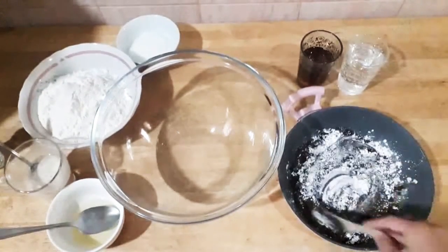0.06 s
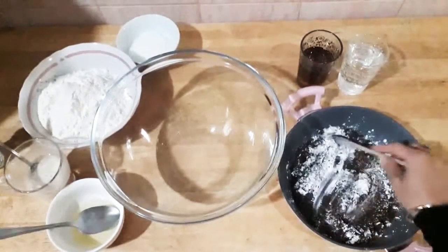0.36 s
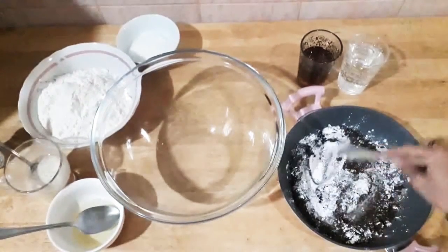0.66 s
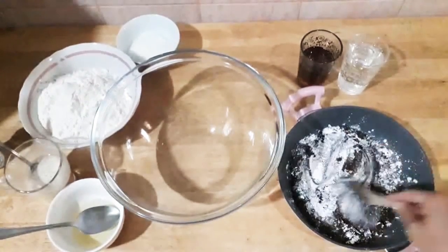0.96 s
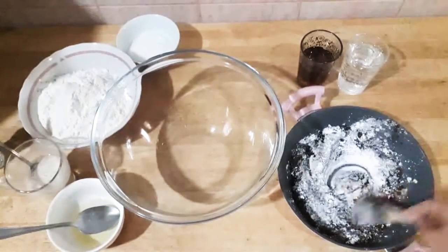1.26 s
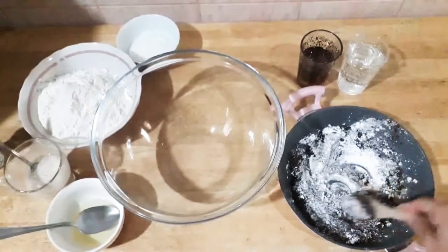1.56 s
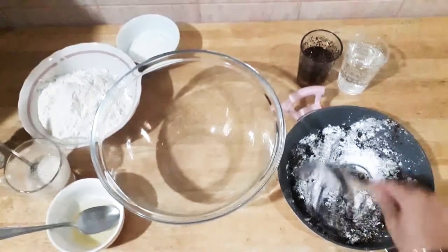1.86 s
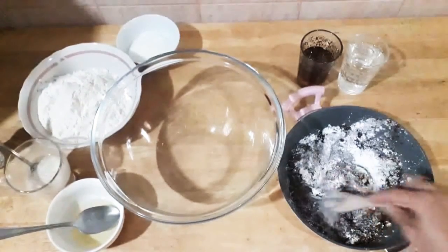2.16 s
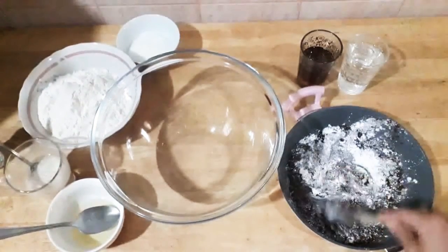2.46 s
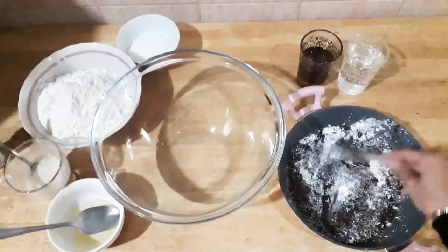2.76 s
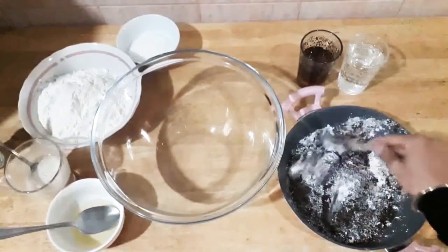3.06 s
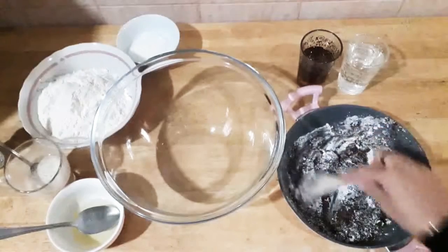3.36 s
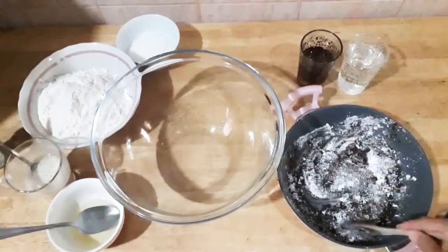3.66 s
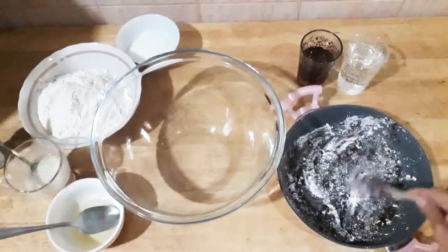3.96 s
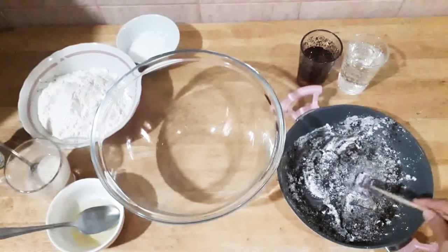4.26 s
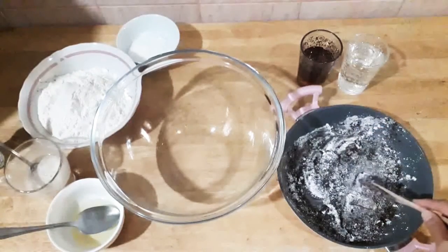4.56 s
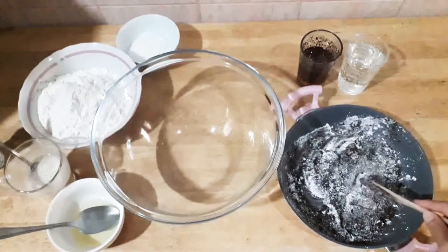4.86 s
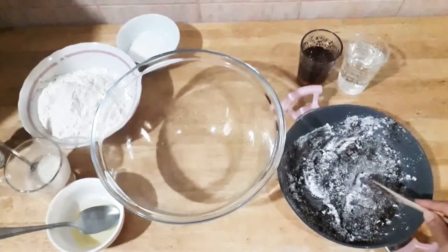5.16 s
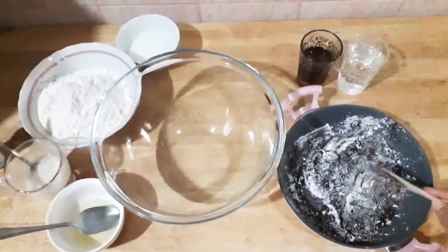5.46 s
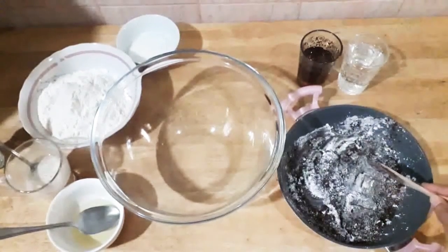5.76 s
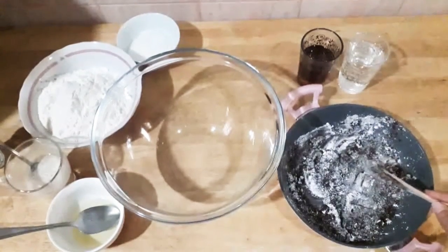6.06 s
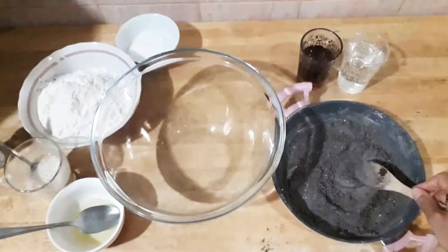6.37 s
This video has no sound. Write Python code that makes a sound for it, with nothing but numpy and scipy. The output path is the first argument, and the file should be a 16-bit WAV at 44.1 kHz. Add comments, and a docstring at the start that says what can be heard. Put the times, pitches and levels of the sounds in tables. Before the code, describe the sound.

Quick gritty spoon scrapes and clacks in a pan of powder end with two hard raps, over a faint kitchen hum.

```python
"""A motor, probably the fridge, hums in a bare kitchen. From 0.1 s a spoon stirs dry powder round a
nonstick pan: each stroke crunches the grains, rasps the pan and lets loose powder hiss. On the way the
spoon knocks on floor and wall, and hard pushes shift the pan on the wooden counter. Two hard raps at
3.9 s and 4.1 s end the stirring; hum and room air go on to 6.5 s."""
import sys
import numpy as np
from scipy import signal
from scipy.fft import rfft, irfft, next_fast_len
from scipy.io import wavfile
from scipy.ndimage import uniform_filter1d

SR = 44100
rng = np.random.default_rng(int(sys.argv[2]) if len(sys.argv) > 2 else 0)


def store_pcm(level_fs):
    """Save levels as 16-bit WAV."""
    pcm = np.round(np.clip(level_fs, -1, 1) * 32767).astype(np.int16)
    wavfile.write(sys.argv[1], SR, np.atleast_2d(pcm).T)


N = 287223


def from_db(db):
    """Decibels to gain."""
    return 10 ** (np.asarray(db) / 20)


def unit_rms(x):
    """Scale to rms 1."""
    return x / np.sqrt(np.mean(x ** 2) + 1e-20)


def add(out, start_s, x):
    """Mix x in from start_s."""
    at = round(start_s * SR)
    out[at:at + len(x)] += x[:len(out) - at]


def filtered(x, spectrum):
    """Apply (f/Hz, gain/dB) points, interpolated in log frequency."""
    size = next_fast_len(len(x), real=True)
    hz = np.fft.rfftfreq(size, 1 / SR)
    points_hz, points_db = np.transpose(spectrum)
    gain_db = np.interp(np.log(np.maximum(hz, 1)), np.log(points_hz), points_db)
    return irfft(rfft(x, size) * from_db(gain_db), size)[:len(x)]


def coloured(x, spectrum):
    """Filter, then scale to rms 1."""
    return unit_rms(filtered(x, spectrum))


def drift(rate_hz):
    """Slow random wander, rms about 1."""
    size, hop = 2 ** 13, 40
    hz = np.fft.rfftfreq(size, hop / SR)
    slow = irfft(rfft(rng.standard_normal(size)) / (1 + (hz / rate_hz) ** 2))
    return np.interp(np.arange(N) / hop, np.arange(size), unit_rms(slow))


def grains(per_s, size_db):
    """Tiny slips at random times; size_db scales their spread in level."""
    sizes = from_db(size_db * np.minimum(rng.exponential(1, N), 4)) * rng.choice([-1, 1], N)
    return sizes * (rng.random(N) < per_s / SR)


def ring(force, modes):
    """Damped modes in parallel, signs alternating."""
    out = 0
    for k, (hz, level_db, t60_s) in enumerate(modes):
        radius = np.exp(-np.log(1000) / (t60_s * SR))
        poles = [1, -2 * radius * np.cos(2 * np.pi * hz / SR), radius ** 2]
        out += (-1) ** k * from_db(level_db) * signal.lfilter([.5, 0, -.5], poles, force + 1e-18)
    return out


def swept(x, hz, width_hz):
    """Resonance with a moving centre; rms 1."""
    out, state = np.zeros(N), np.zeros(2)
    radius = np.exp(-np.pi * width_hz / SR)
    for i in range(0, N, 128):
        block = slice(i, i + 128)
        poles = [1, -2 * radius * np.cos(2 * np.pi * hz[i] / SR), radius ** 2]
        out[block], state = signal.lfilter([1, 0, -1], poles, x[block], zi=state)
    return unit_rms(out)


# stereo width: f/Hz, side-to-mid level/dB
STEREO_WIDTH = [(60, -25.5), (110, -33), (200, -25), (380, -18.5), (700, -14.5), (1290, -15.5),
                (2380, -9.5), (4400, -6), (8120, 0.5), (15000, -5)]


def spread(mid, other):
    """Two unrelated signals to stereo: narrow bass, wide treble."""
    side = filtered(other, STEREO_WIDTH)
    return np.array([mid + side, mid - side])


# kitchen decay: f/Hz, t60/s
KITCHEN_DECAY = [(150, 0.37), (600, 0.41), (1400, 0.5), (3000, 0.45), (5000, 0.32), (8000, 0.39)]


def kitchen(x, wet_db, build_s):
    """Direct sound plus a diffuse tail that builds up, then dies band by band."""
    t = np.arange(2 ** 15) / SR
    hz = np.fft.rfftfreq(len(t), 1 / SR)
    white = rfft(rng.standard_normal(len(t)))
    centres_hz, t60s = np.transpose(KITCHEN_DECAY)
    tail = 0
    for t60_s, share in zip(t60s, np.eye(len(centres_hz))):
        band = irfft(white * np.interp(hz, centres_hz, share))
        tail += band * np.exp(-np.log(1000) * t / t60_s)
    spectrum = rfft(tail)
    whitened = irfft(spectrum / np.sqrt(uniform_filter1d(np.abs(spectrum) ** 2, size=41)))
    build_up = 1 - np.exp(-(t / build_s) ** 2)
    fade_out = np.clip(2 - 2.5 * t / t[-1], 0, 1)
    tail = whitened * build_up * fade_out
    return x + from_db(wet_db) * signal.fftconvolve(x, tail / np.linalg.norm(tail))[:len(x)]


# room air and microphone hiss: f/Hz, relative level/dB
AIR_SPECTRUM = [(20, -14), (45, -11.5), (80, -2), (140, -1), (250, -6), (420, -10), (600, -7.5),
                (900, -11.5), (1400, -16), (1900, -21), (3000, -22), (3900, -19.5), (6000, -24.5),
                (10000, -28.5), (15800, -24)]


def room_air():
    """Steady noise, strongest in the bass."""
    return from_db(-68) * spread(*[coloured(rng.standard_normal(N), AIR_SPECTRUM) for _ in range(2)])


# motor hum lines: f/Hz, rms level/dB
MOTOR_LINES = [(58.5, -76), (116.5, -63), (174, -70.5), (232, -77), (293, -76), (354, -71.5), (414, -70),
               (556, -78), (984, -84), (1535, -87.5), (3150, -88.5)]


def motor():
    """The motor hums in gently wavering lines over a band of whirr."""
    t = np.arange(N) / SR
    hum = 0
    for hz, db in MOTOR_LINES:
        amplitude = np.sqrt(2) * from_db(db + 2.2 * drift(3.5))
        hum += amplitude * np.sin(2 * np.pi * hz * t + 1.2 * drift(2.5))
    whirr_spectrum = [(100, -36), (280, -7.5), (420, 0.5), (560, -12.5), (900, -31), (3000, -68)]
    whirr = coloured(rng.standard_normal(N), whirr_spectrum)
    return hum + from_db(-65.5 + 2 * drift(7)) * whirr


BITE_SHARE, LET_GO_DB_PER_S, LIFT_S = 0.23, 329, 3.95


def pressure(pushes, release_db_per_s):
    """Envelope of pushes, summed in power: each bites, swells or fades, then dies away."""
    power, t = np.zeros(N), np.arange(SR) / SR
    for start_s, length_s, db, swell_db in pushes:
        bite = np.minimum(t / (BITE_SHARE * length_s), 1)
        hold_db = db + swell_db * (np.minimum(t / length_s, 1) - .5)
        release_db = release_db_per_s * np.maximum(t - length_s, 0)
        add(power, start_s, (bite * from_db(hold_db - release_db)) ** 2)
    return np.sqrt(power)


def touching(db):
    """Steady gain while the spoon stays lightly in the powder; dies once it is lifted."""
    lifted_s = np.clip(np.arange(N) / SR - LIFT_S, 0, .5)
    return from_db(db - LET_GO_DB_PER_S * lifted_s)


# counter modes: f/Hz, level/dB, t60/s
COUNTER_MODES = [(111.7, -3, 0.35), (120.7, 1, 0.14), (166.7, -11, 0.37), (261.6, -7, 0.24)]


def counter(force):
    """The wood under the pan rings low."""
    return ring(force, COUNTER_MODES)


# pushes that shift the pan: t/s, length/s, level/dB
PAN_SHOVES = [(0.55, .09, -50.5), (0.797, 0.063, -48), (.94, .06, -44.5), (2.714, 0.11, -49.5),
              (2.877, 0.061, -42), (3.037, 0.3, -46.5), (3.28, .09, -49)]


def dragging():
    """The pan's base shudders on the wood when shoved and trembles while stirred."""
    shoves = [(*shove, 0) for shove in PAN_SHOVES]
    envelope = np.hypot(pressure(shoves, release_db_per_s=109.5), touching(db=-62))
    shudder = grains(per_s=400, size_db=4.5)
    scrape_spectrum = [(60, -14), (110, -2), (380, 10.5), (900, -6.5), (2500, -50), (8000, -59)]
    wood = unit_rms(counter(shudder)) + from_db(-2.5) * coloured(shudder, scrape_spectrum)
    return envelope * unit_rms(wood)


# loose powder: f/Hz, relative level/dB
POWDER_SPECTRUM = [(7000, -22.5), (10000, -8), (12500, 1.5), (16000, 3.5)]


def powder_hiss(runs):
    """Loose powder runs off the spoon with a fine hiss that outlasts each stroke."""
    flow = np.hypot(pressure(runs, release_db_per_s=223.5), touching(db=-84))
    hiss = spread(*[coloured(grains(per_s=5900, size_db=1), POWDER_SPECTRUM) for _ in range(2)])
    return from_db(3) * flow * hiss


# spoon modes: f/Hz, relative level/dB, t60/s
SPOON_MODES = [(1839, -5, 0.059), (2100, 2.5, 0.01), (2575, -7, 0.024), (2910, -3.5, .03),
               (3262, -0.5, 0.024), (3946, 2.5, 0.014), (4130, 1.5, 0.008), (4520, 3.5, 0.011),
               (5215, -3, 0.018), (5610, -4.5, 0.0225), (6100, -5, 0.017), (6870, -20.5, 0.01),
               (7460, -15, .02), (8300, -7, 0.0097)]


def spoon_ring():
    """Grains set the spoon ringing; different modes speak as the contact point wanders."""
    crush = grains(per_s=4600, size_db=-4.5)
    modes = sum(from_db(16 * np.tanh(drift(12))) * ring(crush, [mode]) for mode in SPOON_MODES)
    return coloured(modes, [(700, -14), (1600, 0), (8200, -2), (9500, -12.5)])


# crushed grains: f/Hz, relative level/dB
CRUNCH_SPECTRUM = [(900, -20), (2000, -17.5), (3000, 2), (4100, 2.5), (5000, -1.5), (6300, -1.5),
                   (8200, -12), (9500, -35), (12000, -22)]


def grain_crunch():
    """Grains give way under the spoon in dense clicks."""
    return coloured(grains(per_s=4200, size_db=-3), CRUNCH_SPECTRUM)


# pan modes: f/Hz, level/dB, t60/s
PAN_MODES = [(341, -25.5, 0.18), (410.7, -4, 0.02), (426, -42.5, 0.26), (543, -19, 0.07),
             (658.6, -15.5, 0.096), (776, -19, 0.11), (815, -22.5, 0.15), (920, -0.5, 0.0067),
             (941, -24.5, 0.19), (1058, -28.5, 0.0493), (1227, -14.5, 0.081), (1300, -1.5, 0.012),
             (1389, -29, 0.16), (1403, -33.5, 0.2), (1706, -27, 0.23), (2177, 6, 0.0023), (2386, -39, 0.14),
             (2924, -11.5, 0.0058)]


def pan(force):
    """The powder-damped pan: short modes clack, long ones ring faintly."""
    return ring(force, PAN_MODES)


# spoon edge on pan: f/Hz, relative level/dB
RASP_SPECTRUM = [(200, -18), (400, 7), (600, 4), (900, 5), (1300, 6.5), (1900, -5), (2700, -10.5),
                 (4500, -36)]


def pan_rasp(pitch_hz):
    """The spoon's pressed edge slips over the pan, with a moving pitch."""
    slips = grains(per_s=3000, size_db=1.5)
    edge_slips = coloured(grains(per_s=2600, size_db=2.5), [(2500, -13), (9000, -28)])
    edge = swept(edge_slips, pitch_hz, width_hz=1300)
    scrape = coloured(slips, RASP_SPECTRUM)
    return from_db(-3) * scrape + from_db(-23.5) * unit_rms(pan(slips)) + from_db(-5) * edge


# spoon strokes, levels relative:
# t/s, length/s, crunch level/dB, swell/dB, rasp over crunch/dB, rasp f/Hz, hiss level/dB
SPOON_STROKES = [(0.137, 0.063, -48, 0, 4.5, 1450, -72), (0.425, 0.17, -49.5, -3.5, 6.5, 1550, -68),
                 (0.815, 0.11, -53, 11.5, 8.5, 1070, -82), (0.943, 0.12, -51, 3.5, 11.5, 1190, -79),
                 (1.09, 0.1, -52.5, -4, -6, 1240, -71), (1.157, 0.075, -49.5, 4, 3, 1360, -77),
                 (1.237, .02, -43.5, 3, -5.5, 1820, -79), (1.307, 0.11, -46, 4, 2.5, 1780, -80),
                 (1.411, .11, -52.5, 3, -6, 1850, -69), (1.534, 0.025, -51, 3.5, -5, 1780, -70),
                 (1.805, 0.055, -49, -3.5, 4.5, 1350, -73), (2.166, 0.029, -56.5, 7, -14, 1500, -70),
                 (2.447, 0.052, -53.5, 14, 2.5, 1350, -75), (2.684, 0.072, -61.5, -22, -1, 1190, -78),
                 (2.868, 0.057, -62, 7, 4, 950, -78), (2.949, 0.037, -52, -4, 8, 1440, -72),
                 (3.144, 0.065, -62.5, 1, -20, 900, -80), (3.284, 0.11, -49, -4.5, 11, 1200, -74),
                 (3.396, 0.085, -51, -3.5, 2, 1860, -64), (3.71, 0.032, -51, 3.5, 1.5, 1500, -68),
                 (3.909, 0.06, -58, 5, -2.5, 1347, -73), (4.098, 0.17, -67.5, -5, 9, 1184, -73)]


def stirring():
    """Each stroke crunches grains, rasps the pan and spills powder off the spoon."""
    t = np.arange(N) / SR
    start_s, length_s, crunch_db, swell_db, rasp_db, rasp_hz, hiss_db = np.transpose(SPOON_STROKES)
    middle_s = start_s + length_s / 2
    pushes = zip(start_s, length_s, crunch_db, swell_db)
    force = np.hypot(pressure(pushes, LET_GO_DB_PER_S), touching(db=-70.5))
    judder = from_db(1.3 * drift(45))  # the spoon catches and slips
    crunch = from_db(-3.5) * spoon_ring() + from_db(-4.5) * grain_crunch()
    rasp = from_db(np.interp(t, middle_s, rasp_db)) * pan_rasp(np.interp(t, middle_s, rasp_hz))
    rubbing = from_db(-2.5) * judder * force * (crunch + rasp)
    runs = zip(start_s, length_s, hiss_db, swell_db)
    return kitchen(rubbing, wet_db=-4.5, build_s=0.0017) + powder_hiss(runs)


def blow(hz, floor_db, tick_db):
    """One contact: a brief ring of the struck spot, the pan's floor below that pitch, and a tick."""
    click = signal.unit_impulse(2 ** 15) + 1e-18
    force = signal.sosfilt(signal.butter(2, 1.064 * hz, fs=SR, output="sos"), click)
    spot = signal.lfilter(*signal.iirpeak(hz, 2.4, fs=SR), force)
    floor = signal.sosfilt(signal.butter(1, 0.85 * hz, fs=SR, output="sos"), force)
    tick = signal.sosfilt(signal.butter(1, 3000, "high", fs=SR, output="sos"), click)
    hardness = (hz / 1300) ** 2
    return spot + from_db(floor_db - 3.5) * floor + from_db(tick_db) * hardness * tick


def rim_echoes(x, echo_db):
    """Bending waves return from the rim within milliseconds, each weaker than the last."""
    out = x.copy()
    delays_s = np.sort(rng.uniform(0.00072, 0.006033, size=4))
    signs = rng.choice([-1, 1], size=4)
    for k, (delay_s, sign) in enumerate(zip(delays_s, signs)):
        add(out, delay_s, sign * from_db(echo_db - k) * x)
    return out


def with_rebounds(strikes):
    """Each strike, then two rebounds on a softer contact, the second sooner and weaker."""
    for start_s, db, hz, floor_db, thud_db, gap_s, rebound_db in strikes:
        yield start_s, db, hz, floor_db, thud_db
        for late_s, change_db in (gap_s, rebound_db), (1.55 * gap_s, rebound_db - 7.5):
            yield start_s + late_s, db + change_db, 0.71 * hz, floor_db, thud_db + change_db


# spoon knocks, levels relative:
# t/s, level/dB, contact f/Hz, pan floor level/dB, counter thud level/dB, rebound gap/s, rebound/dB
SPOON_KNOCKS = [(.123, -15, 437, -4, -22, .015, -1), (0.41, -20.5, 460, 8.5, -39, .015, -2),
                (.754, -11, 1210, 4, -10, 0.0084, -16), (.942, -2, 1130, -25, -8, .01, -18),
                (1.761, -12.5, 1050, 8.5, -5, 0.025, -0.5), (2.02, -6, 890, -2.5, -26, 0.0082, -20),
                (2.037, 0, 944, -2.5, 6, 0.018, -3.5), (2.169, -13, 1400, 9.5, -5, 0.02, -22),
                (2.43, -6.5, 453, -16, -23, .022, -5.5), (2.667, 5, 1620, -8, -12, .012, -1),
                (2.87, -13.5, 650, 7, -4, .011, 1.5), (2.891, -6.5, 800, 1.5, -6, .014, -10),
                (2.959, -8, 990, -19, -20, .012, -17), (3.036, -15.5, 680, 2.5, 6.5, .02, -10),
                (3.142, -12.5, 830, 4.5, -34, .018, 2.5), (3.271, -10, 1260, 11, -12, 0.021, -5),
                (3.67, -2.5, 608, -5, -5, 0.021, -5.5), (3.9107, 10, 1590, -12, 2.5, 0.022, -5),
                (4.095, 8.5, 2000, -14.5, -10, 0.0064, 0)]


def knocks():
    """The spoon strikes the pan, each time at another spot, and the pan bumps the counter."""
    out = np.zeros(N)
    coating = signal.butter(6, 3900, fs=SR, output="sos")
    thud = counter(blow(hz=218, floor_db=4, tick_db=-41))
    for start_s, db, hz, floor_db, thud_db in with_rebounds(SPOON_KNOCKS):
        struck = pan(blow(hz, floor_db, tick_db=-28.5))
        clack = rim_echoes(signal.sosfilt(coating, struck), echo_db=-8.5)
        add(out, start_s, from_db(db - 17.5) * kitchen(clack, wet_db=-1, build_s=0.00161))
        add(out, start_s, from_db(thud_db - 42) * thud)
    return out


def scene():
    """All sources centred; only powder hiss and room air have width."""
    return knocks() + stirring() + dragging() + motor() + room_air()


def record(dry):
    """Roll off the deep bass and cut the top."""
    highpass = signal.butter(2, 45, "high", fs=SR, output="sos")
    lowpass = signal.ellip(12, .1, 70, 15800, fs=SR, output="sos")
    return signal.sosfilt(lowpass, signal.sosfilt(highpass, dry))


dry = scene()
out = record(dry)
store_pcm(out)
```